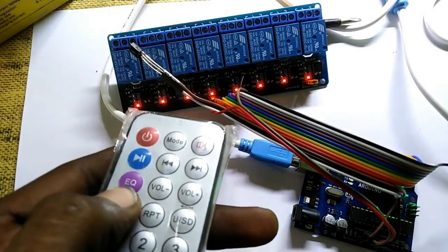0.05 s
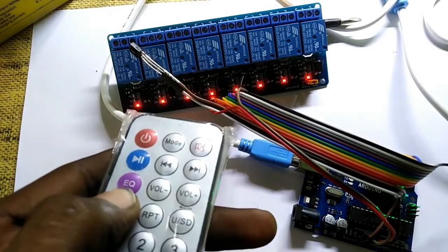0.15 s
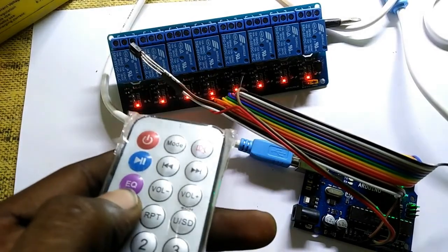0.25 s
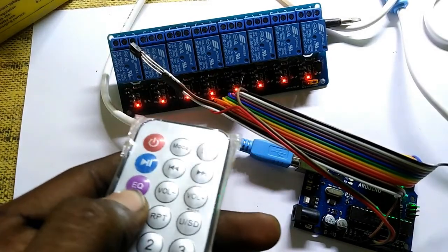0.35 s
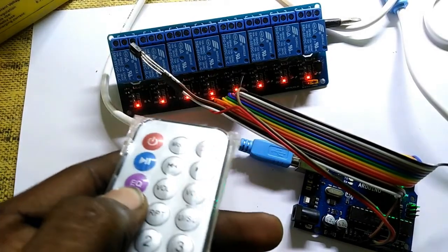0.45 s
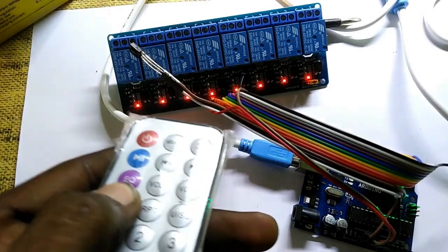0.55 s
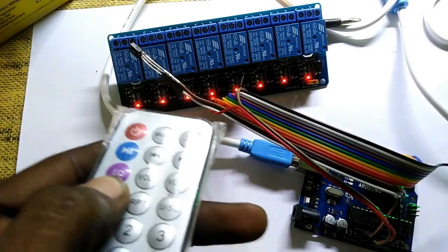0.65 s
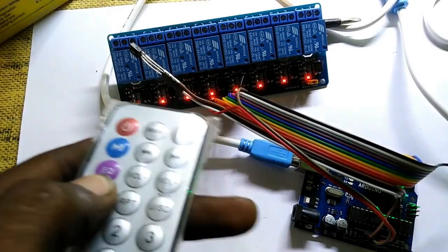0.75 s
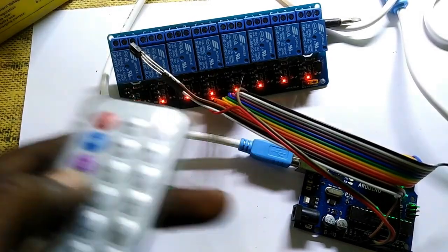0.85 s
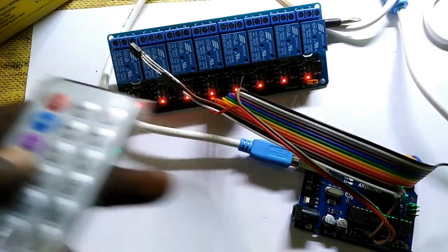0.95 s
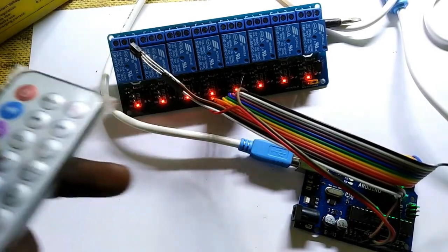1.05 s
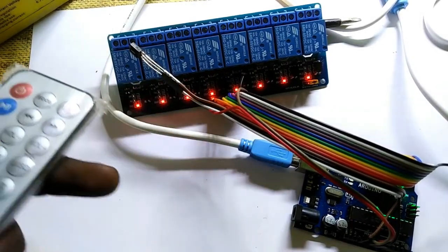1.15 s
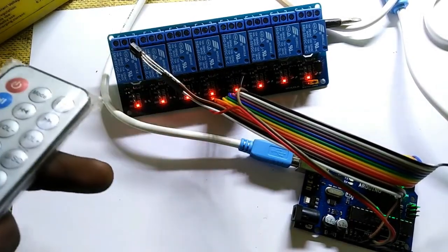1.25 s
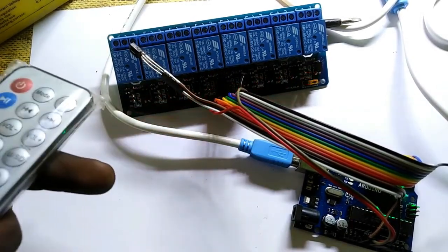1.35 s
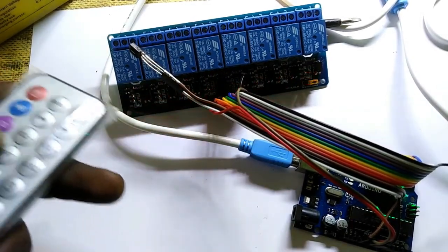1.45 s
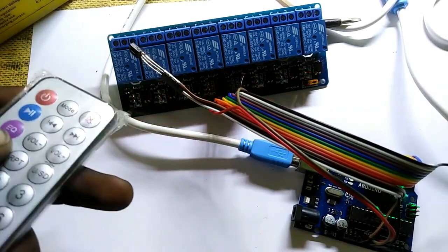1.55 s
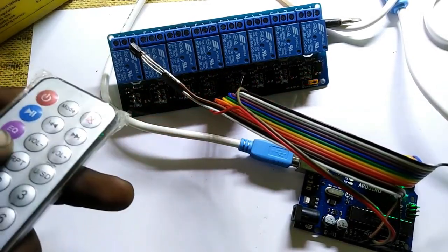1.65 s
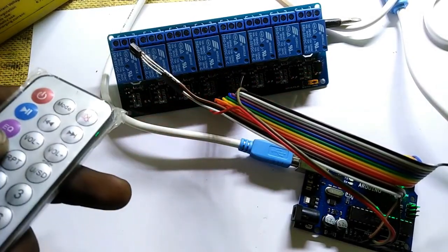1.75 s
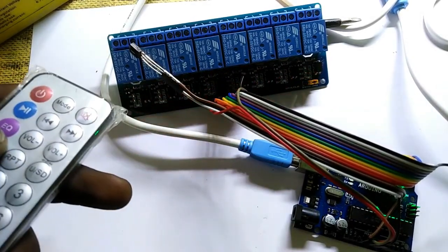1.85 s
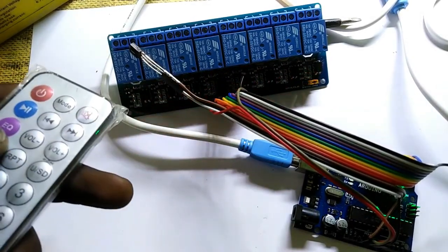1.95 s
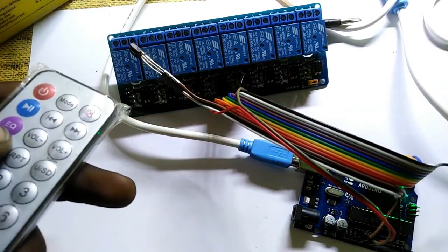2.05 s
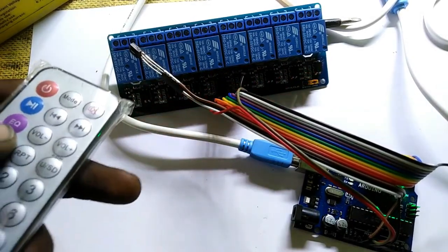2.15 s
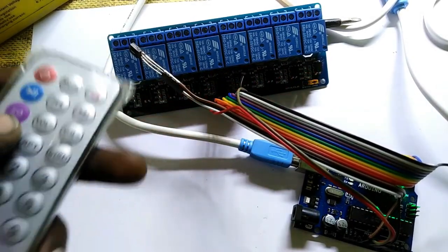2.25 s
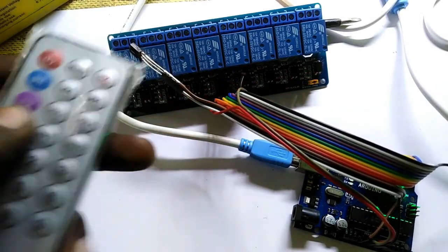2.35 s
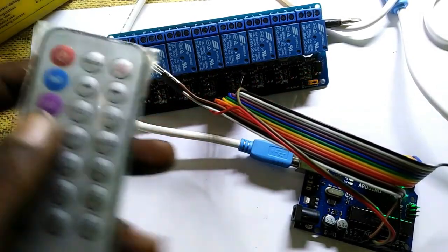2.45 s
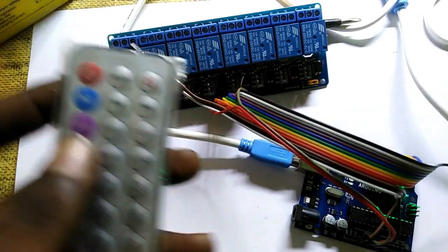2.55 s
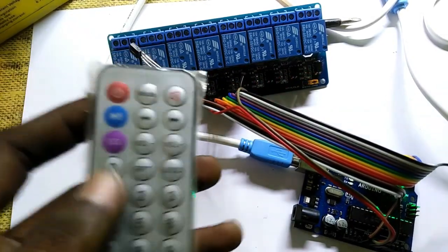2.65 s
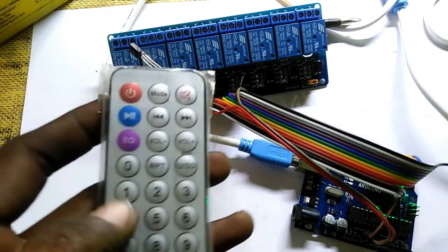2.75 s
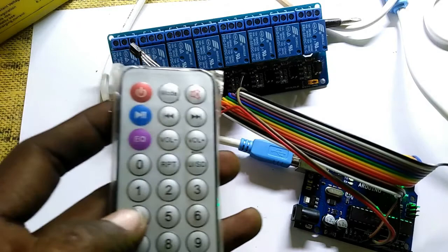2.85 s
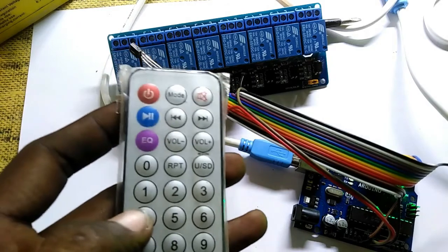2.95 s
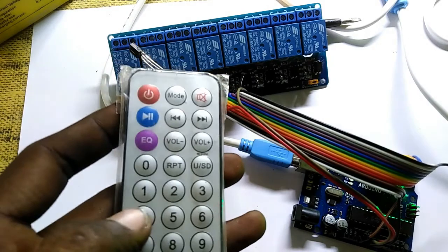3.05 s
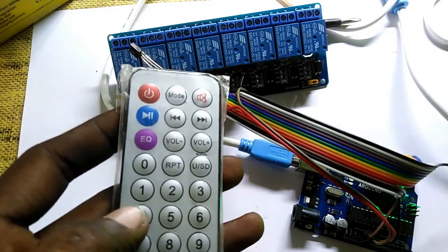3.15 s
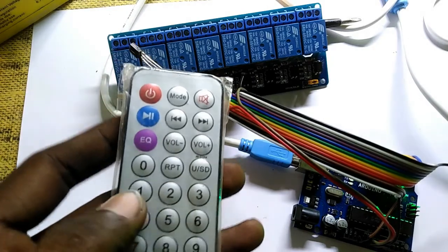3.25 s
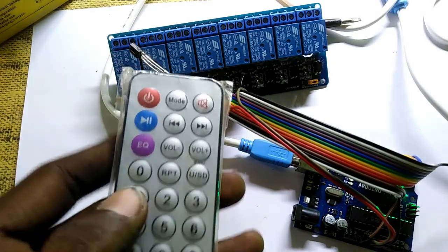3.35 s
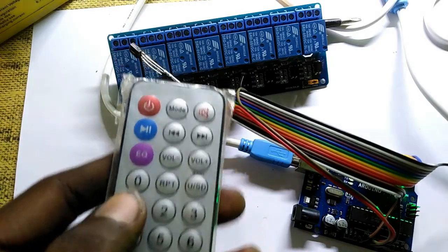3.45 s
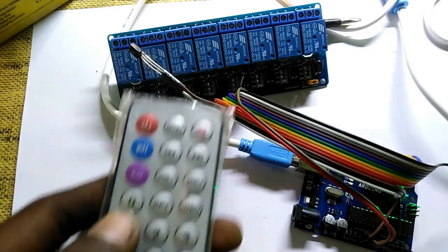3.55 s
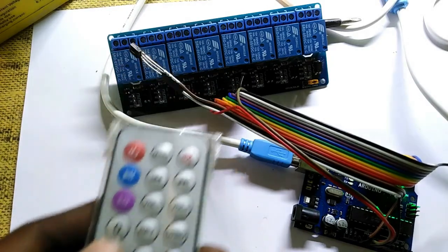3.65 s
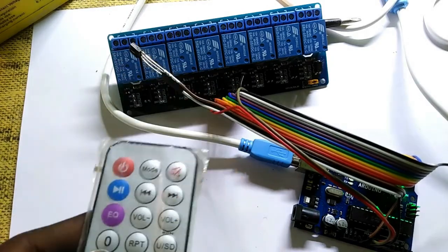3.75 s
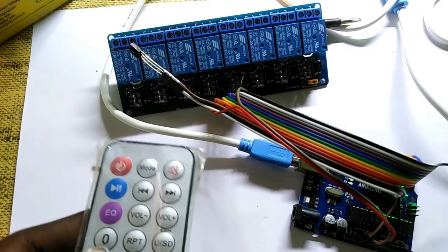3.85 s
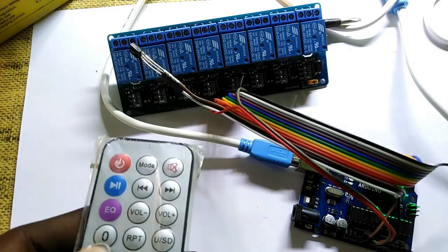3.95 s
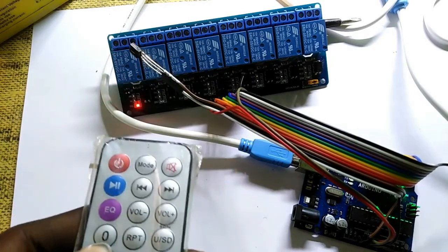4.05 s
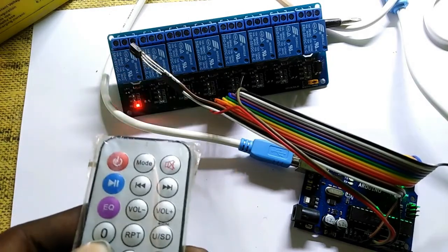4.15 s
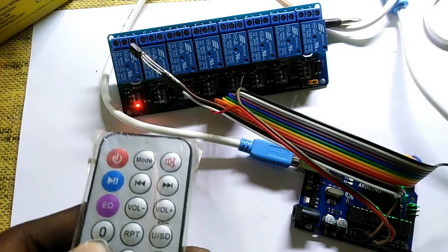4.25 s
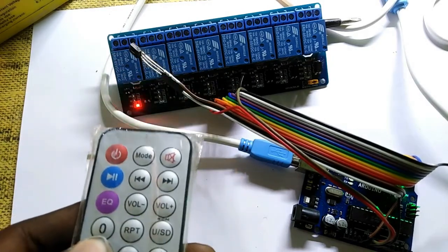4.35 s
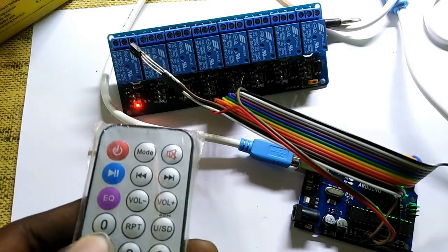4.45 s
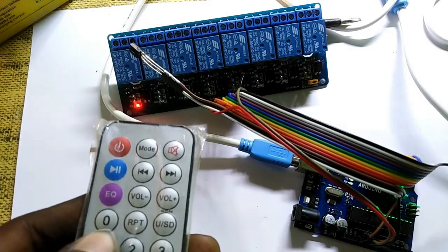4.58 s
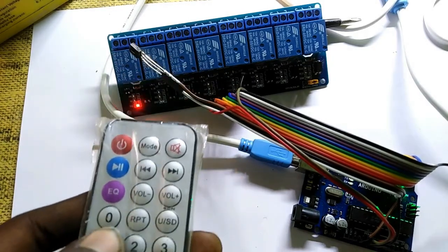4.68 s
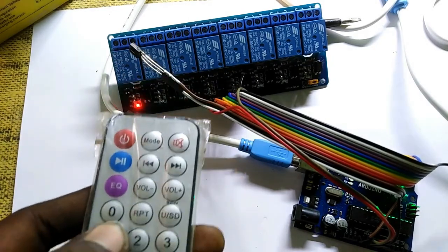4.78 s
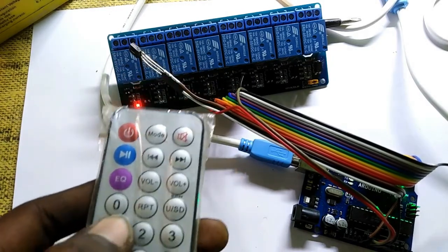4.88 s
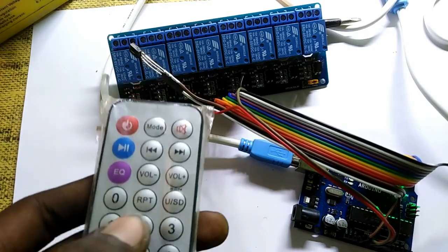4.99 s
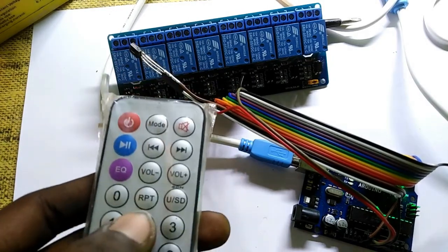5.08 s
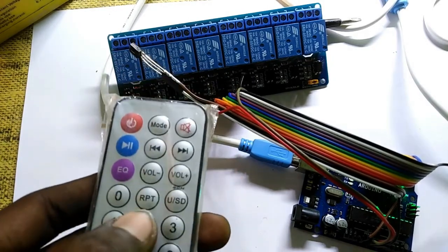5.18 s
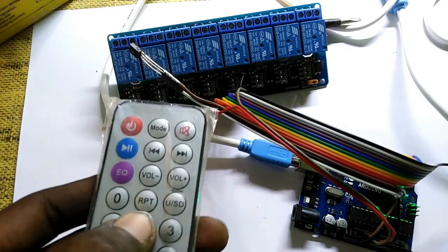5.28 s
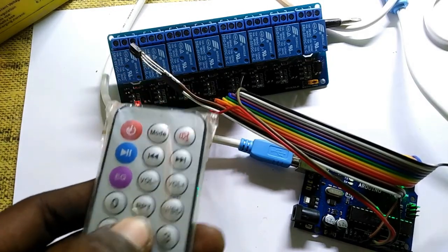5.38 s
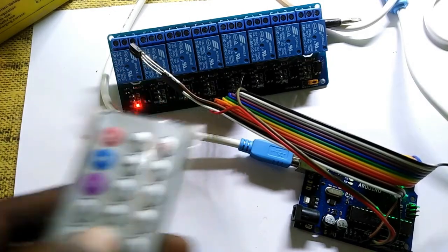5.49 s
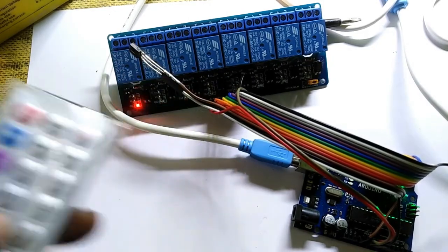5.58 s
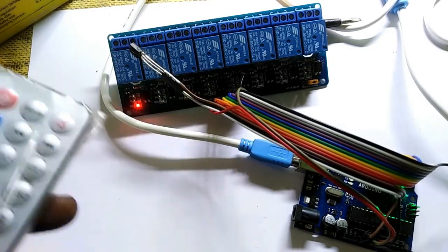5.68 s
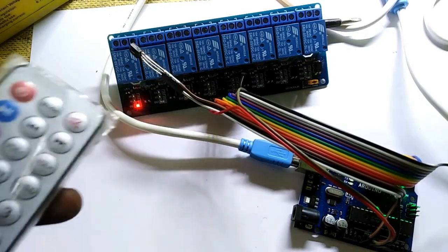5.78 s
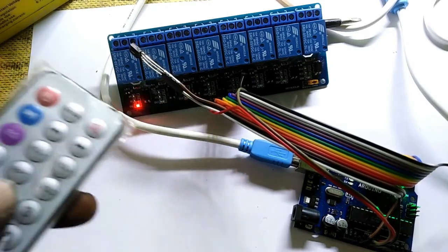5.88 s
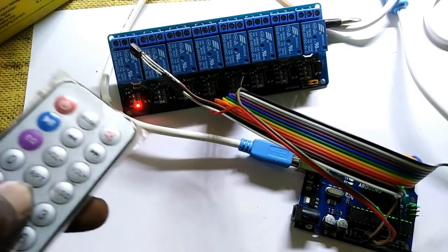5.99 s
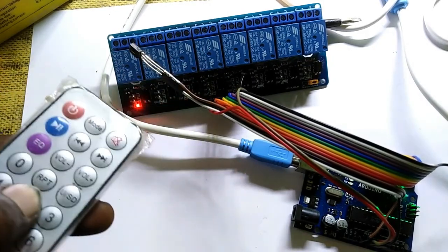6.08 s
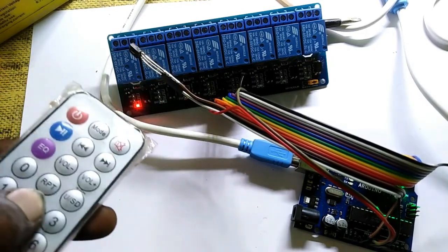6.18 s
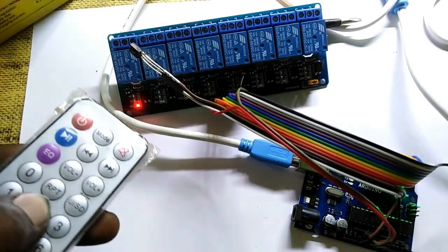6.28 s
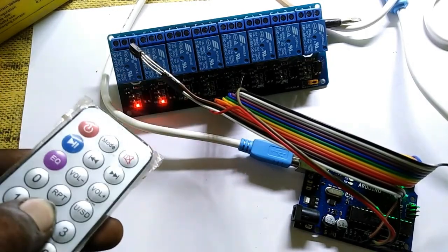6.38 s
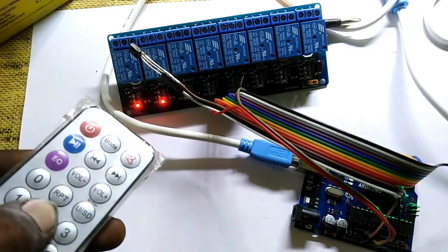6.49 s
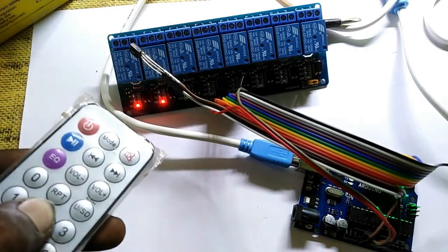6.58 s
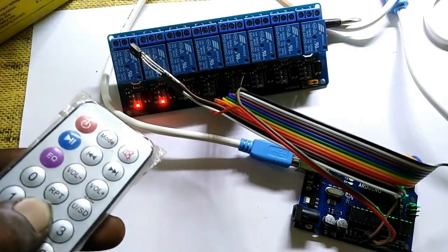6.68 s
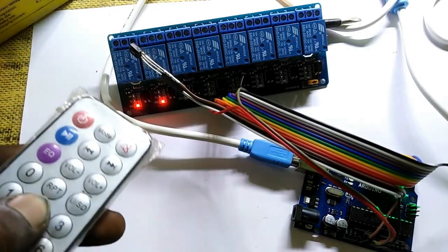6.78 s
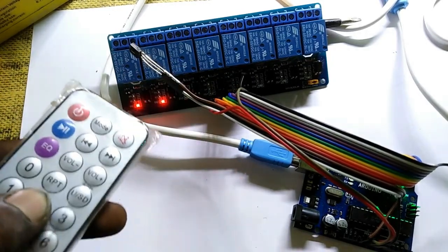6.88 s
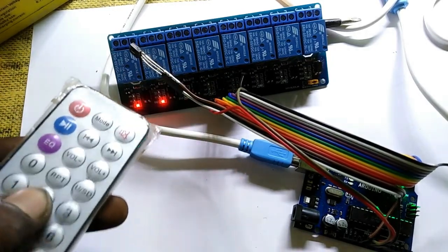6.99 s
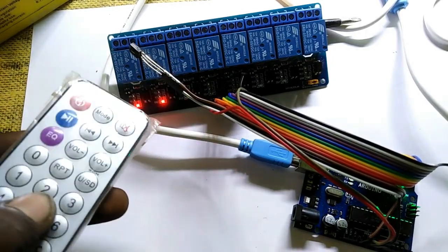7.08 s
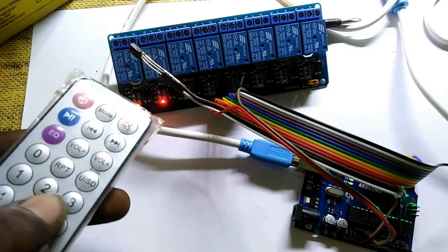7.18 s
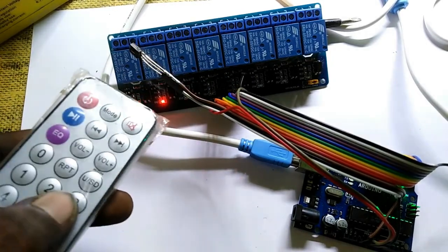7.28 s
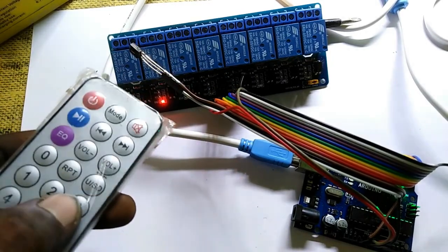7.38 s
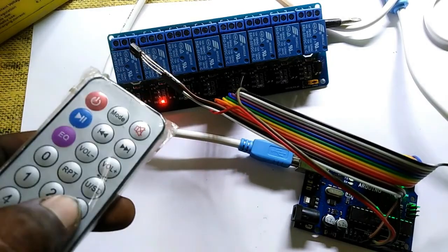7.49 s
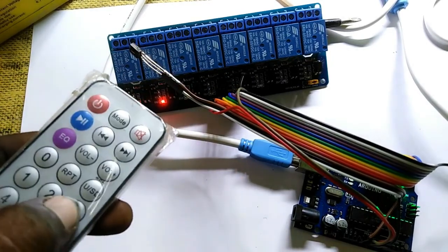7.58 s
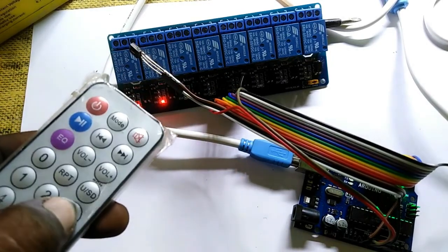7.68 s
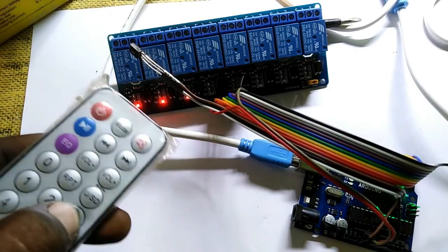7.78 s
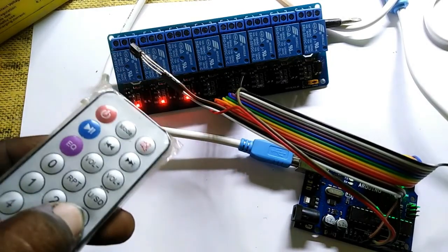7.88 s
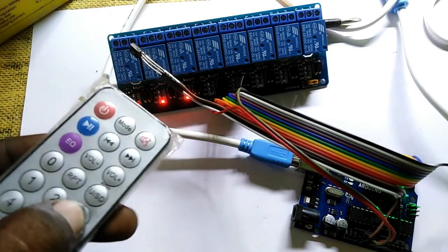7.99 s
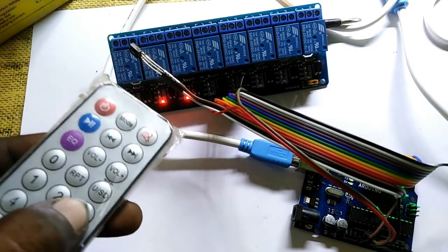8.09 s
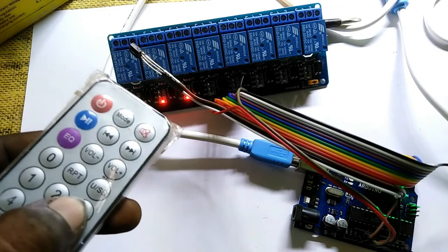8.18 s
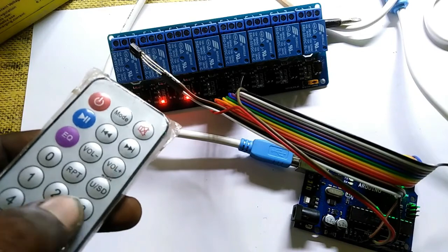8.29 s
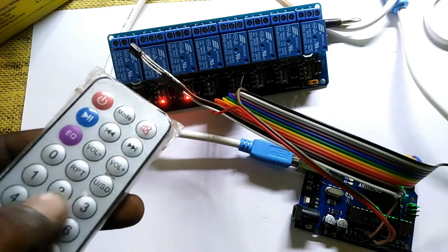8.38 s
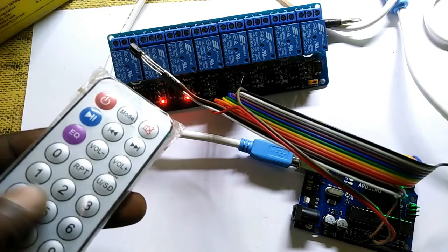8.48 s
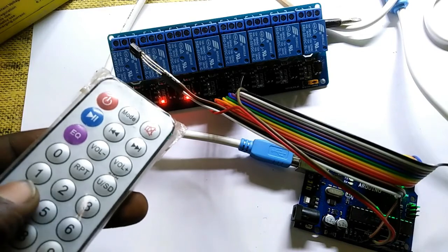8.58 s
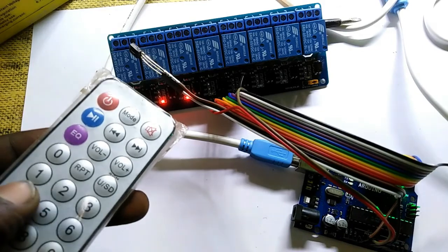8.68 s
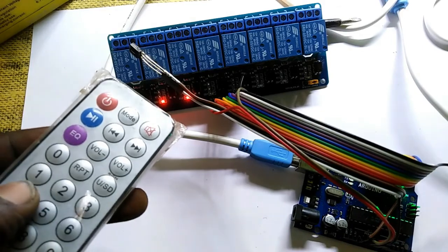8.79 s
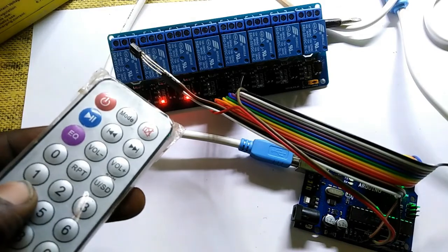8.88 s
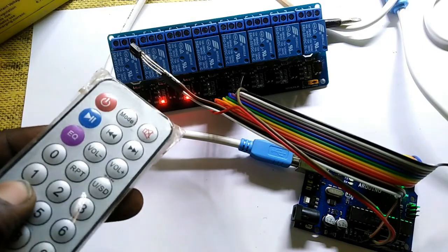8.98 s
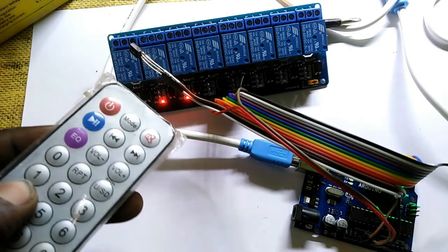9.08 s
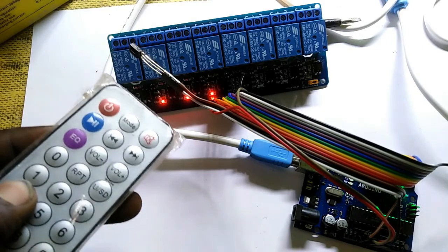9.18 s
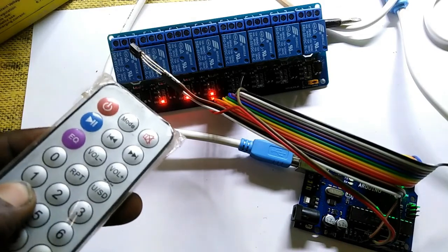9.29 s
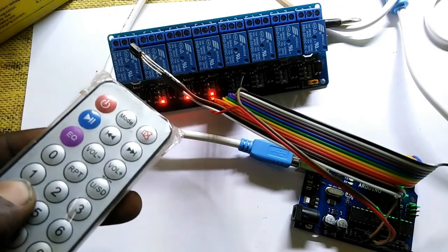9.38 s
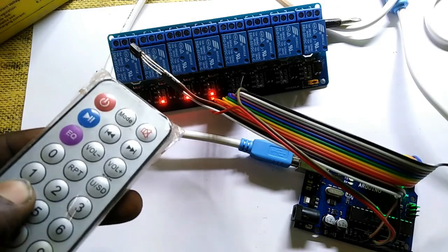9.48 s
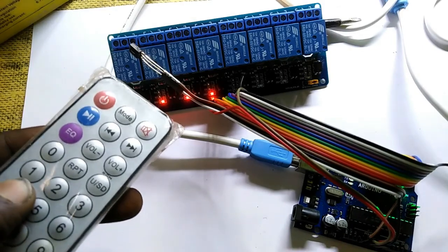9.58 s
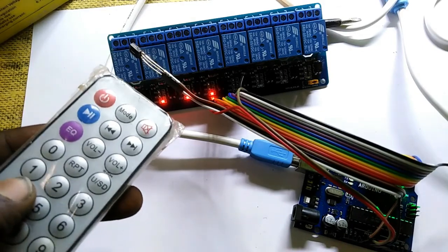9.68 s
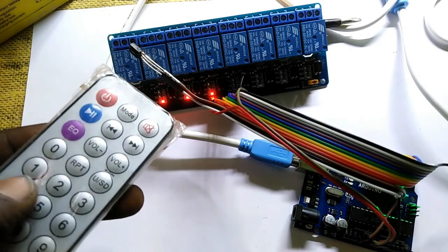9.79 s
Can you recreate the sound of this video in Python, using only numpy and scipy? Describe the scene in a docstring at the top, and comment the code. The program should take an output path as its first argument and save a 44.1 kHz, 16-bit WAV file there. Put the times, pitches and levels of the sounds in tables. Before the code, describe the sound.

Close-up loud relay snaps on a small circuit board, with a handheld remote's plastic sleeve ticking and rustling, and a bird chirping faintly outside.

```python
"""Relay board in a hard room

A relay board on a desk is switched with a small remote control, close to a two-port microphone.
All eight relays drop out almost at once and shake the board; later four pull in, one by one.
The remote's keys clack; its plastic sleeve rubs, snaps and crinkles. A bird calls outside, and there are
a few soft knocks, low handling bumps and brief hollow tones over room air and hiss.
Struck things are resonant or noisy clicks sent through a direct, a near and a room path."""
import sys
import numpy as np
from scipy import signal
from scipy.io import wavfile
from scipy.ndimage import uniform_filter1d

SR = 44100
rng = np.random.default_rng(int(sys.argv[2]) if len(sys.argv) > 2 else 0)


def master_out(mix):
    """Clip the mix to full scale and print it as 16-bit PCM to the path in sys.argv[1]."""
    frames = np.transpose(np.atleast_2d(mix))
    ceiling = np.clip(frames, -1, 1)
    pcm = np.round(ceiling * 32767).astype(np.int16)
    wavfile.write(sys.argv[1], SR, pcm)


N = 433944
TIME = np.arange(N) / SR
TAPS = 4096  # samples in one click
BINS = np.fft.rfftfreq(TAPS, 1 / SR)  # its frequencies, Hz

# relays pulling in: [t/s, level/dB, the armature's low, middle and top mode f/Hz,
# contact chatter level/dB, push on the board level/dB, lingering ring level/dB]
PULL_INS = [(3.907, 3.5, 7500, 9700, 13570, 0.5, -49.5, -16),
            (6.2228, 2.2, 6770, 9700, 12850, -2.5, -46.5, -18.5),
            (7.6506, 1.5, 7060, 8350, 11350, -0.5, -49.5, -20.5),
            (8.9656, 3, 6270, 9130, 12550, -3.5, -48, -29)]
# modes of a relay case: [f/Hz, width/Hz, level/dB]
CASE_MODES = [(2360, 120, -1), (2610, 210, -4.5), (3450, 270, -7), (4700, 340, -14), (6190, 232, -17),
              (7420, 1300, -0.5)]
# colour of a hard plastic snap: [f/Hz, level/dB]
PLASTIC_COLOUR = [(300, -19), (1600, -14.5), (2400, 2), (5500, 4), (7500, 7), (10000, 3.5), (13800, 10)]


def amp(db):
    """Decibels to gain."""
    return 10 ** (np.asarray(db) / 20)


def evened(x):
    """Scales to rms 1."""
    return x / np.sqrt(np.mean(x ** 2) + 1e-20)


def unit(x):
    """Scales each channel to energy 1."""
    return x / np.linalg.norm(x, axis=-1, keepdims=True)


def read(points, hz):
    """Reads a table on a log-frequency axis."""
    f, value = np.transpose(points)
    return np.interp(np.log(hz + 1), np.log(f + 1), value)


def add(mix, s, sound):
    """Adds a sound to the stereo mix at time s, cut where the mix ends."""
    part = mix[:, max(round(s * SR), 0):][:, :sound.shape[-1]]
    part += sound[..., :part.shape[1]]


def convolve(a, b):
    """Convolution along time, channel by channel."""
    return signal.fftconvolve(np.atleast_2d(a), np.atleast_2d(b), axes=1)


def impulse(db):
    """The minimum-phase click that has this spectrum, with dips limited to 100 dB below the peak."""
    log_gain = np.log(amp(np.maximum(db, db.max() - 100)))
    circle = np.r_[log_gain, log_gain[-2:0:-1]]
    return np.fft.ifft(np.exp(np.conj(signal.hilbert(circle)))).real


def resonances(modes):
    """Spectrum in dB of a body with these modes; it radiates little below them."""
    power = 0
    for hz, width, db in modes:
        detuning = (BINS ** 2 - hz ** 2) / (width * (BINS + 1))
        power = power + amp(db) ** 2 / (1 + detuning ** 2)
    return 10 * np.log10(power)


def top_treble(edge_hz=9500):
    """A soft step over frequency from 0 to 1 around the edge."""
    return 1 / (1 + (edge_hz / (BINS + 1)) ** 8)


def scatter(t60, size=2 * TAPS):
    """A dying cloud of reflections, different at each microphone port."""
    t = np.arange(size) / SR
    cloud = rng.standard_normal((2, size)) * amp(-60 * t / t60)
    return unit(cloud * (1 - np.exp(-t / .001)))


def room(delay=0.0043):
    """The late sound of the room: each band has its own strength and dies at its own speed."""
    # reverberation by band: [f/Hz, t60/s, level/dB]
    reverb = np.array([(306, 0.32, 5.5), (1170, 0.44, -1.5), (2350, 0.34, 4.5), (3140, 0.49, 4.5),
                       (4960, 0.59, 4.5), (13300, 0.47, -5)])
    hz, t = np.fft.rfftfreq(256, 1 / SR), np.arange(0, .8, 128 / SR)
    a, b = rng.standard_normal((2, 2, len(hz), len(t)))
    t60, db = (read(reverb[:, [0, k]], hz)[:, None] for k in (1, 2))
    tail = signal.istft((a + 1j * b) * amp(db - 60 * t / t60), SR, nperseg=256)[1]
    build_up = 1 - np.exp(-(np.arange(tail.shape[1]) / SR / delay) ** 2)
    return unit(tail * build_up)


def heard(sound, direct_db, near_db, near_t60, room_db):
    """A sound arrives directly (right port first), off the desk and hand, and from the room."""
    path = amp(room_db) * room()
    add(path, 0, amp(near_db) * scatter(near_t60))
    path[[0, 1], [8, 0]] += amp(direct_db)  # the left port is 8 samples later
    return convolve(sound, path)


def rubbing(uneven_db=2.0, rise_s=0.016, fade_s=0.2):
    """Loudness of the sleeve's rubbing: it builds unevenly while the grip shifts and fades as the hand settles."""
    # shifts of the grip: [start t/s, end t/s, rub level/dB]
    grips = [(0.889, 1.25, -62.5), (2.067, 2.559, -57), (2.94, 3.427, -63), (3.46, 3.795, -62.5),
             (4.62, 5.46, -61), (5.68, 6.15, -63.5), (6.687, 7.046, -61), (7.374, 7.574, -62.5),
             (8.075, 8.32, -60.5), (8.53, 8.608, -57), (9.134, 9.69, -61.5)]
    power = np.zeros(N)
    for start, end, db in grips:
        swell = 1 - np.exp(-np.maximum(TIME - start, 0) / rise_s)
        fade = np.exp(-np.maximum(TIME - end, 0) / fade_s)
        power += (amp(db) * swell * fade) ** 2
    uneven = evened(uniform_filter1d(rng.standard_normal(N), size=1500))
    return np.sqrt(power) * amp(uneven_db * uneven)


def background(air_db=-59, hiss_db=-59.5, patch_db=1.9, flicker_db=5.0, top_follow=0.52):
    """Patchy, flickering room air, and a steady hiss that grows louder and broader as the sleeve rubs."""
    # room air, relative spectrum: [f/Hz, level/dB per Hz]
    air_colour = [(28, -45), (45, -26), (90, 4), (150, -4), (250, -4), (420, -3.5), (700, -17.5),
                  (850, -11.5), (960, 3), (1100, -9), (1500, -17.5), (2500, -18.5), (4000, -20),
                  (9000, -27.5)]
    # hiss, relative spectrum: [f/Hz, level/dB per Hz]
    hiss_colour = [(1400, -7), (2200, -11), (3200, -27), (4300, -5.5), (5200, 7), (5700, -4.5), (6400, 5),
                   (9500, -4.5), (14500, -8)]
    # likeness of the two ports: [f/Hz, left-right correlation]
    likeness = [(50, 0.75), (300, 0.94), (1200, 0.12), (2500, 0.019)]
    hz, t = np.fft.rfftfreq(1024, 1 / SR), np.arange(N // 256 + 5) * 256 / SR
    a, b, c, d, patches, flicker = rng.standard_normal((6, len(hz), len(t)))
    # smoothed over frequency, then over time
    patches = evened(uniform_filter1d(uniform_filter1d(patches, size=3, axis=0), size=7, axis=1))
    flicker = evened(uniform_filter1d(uniform_filter1d(flicker, size=3, axis=0), size=5, axis=1))

    same = np.clip(read(likeness, hz), -1, 1)[:, None]
    left = a + 1j * b
    right = same * left + np.sqrt(1 - same ** 2) * (c + 1j * d)
    z = np.array([left, right])

    level_db = 20 * np.log10(np.hypot(amp(hiss_db), np.interp(t, TIME, rubbing())))
    off_centre = np.minimum(abs(np.log2((hz + 1) / 6000)), 1)  # octaves from 6 kHz, at most 1
    broaden_db = top_follow * np.outer(off_centre, level_db - level_db.mean())
    restless = np.clip(hz / 1000, 0, 1)[:, None]  # the bass is steadier than the middle
    air = z * amp(read(air_colour, hz)[:, None] + restless * (patch_db * patches + flicker_db * flicker))
    hiss = 1j * z * amp(read(hiss_colour, hz)[:, None] + patch_db * patches + broaden_db)
    air, hiss = (evened(signal.istft(v, nperseg=1024, noverlap=768)[1][:, :N]) for v in (air, hiss))
    return amp(air_db) * air + amp(np.interp(TIME, t, level_db)) * hiss


def bird(waver=0.0066, flutter=0.0075, second_db=-7, third_db=-6, echo_s=0.11, echo_db=-9):
    """Fluttering whistles climb, leap in pitch and fade; overtones join when loud, and a wall echoes them."""
    # calls: [t/s, length/s, starting f/Hz, leap in pitch/Hz (negative is down), time until the leap/s, level/dB]
    chirps = [(0.0, 0.14, 3700, -10, 0.11, -66.5), (4.903, 0.22, 3746, 246, 0.061, -62),
              (5.309, 0.17, 4045, 220, 0.115, -50), (5.829, 0.25, 4172, 209.5, 0.12, -53)]
    climb_hz_per_s, leap_s = 553, 0.0095
    rise_s, fade_db_per_s = 0.055, 58
    mix = np.zeros((2, N))
    for s, length, hz, leap_hz, leap_at, db in chirps:
        t = np.arange(0, length, 1 / SR)
        fast, slow = (evened(uniform_filter1d(rng.standard_normal(SR), size=size))[:len(t)]
                      for size in (90, 600))
        leap = .5 + .5 * np.tanh((t - leap_at) / leap_s)
        pitch = (hz + climb_hz_per_s * t + leap_hz * leap) * (1 + waver * fast + flutter * slow)
        phase = 2 * np.pi * np.cumsum(pitch) / SR
        swell = np.minimum(t / rise_s, 1) * amp(-fade_db_per_s * np.maximum(t - rise_s, 0))
        tone = sum(amp(level) * swell ** k * np.sin(k * phase)
                   for k, level in enumerate([0, second_db, third_db], 1))
        for delay, path_db in ((0, 0), (echo_s, echo_db)):
            call = amp(db + path_db) * tone * signal.windows.tukey(len(t), .1)
            add(mix, s + delay, heard(call, direct_db=10, near_db=6.5, near_t60=0.06, room_db=6.5))
    return mix


def hollows(width_hz=130, seconds=0.12):
    """Brief hollow tones: narrow bands of noise swell and fade."""
    # tones: [t/s, f/Hz, level/dB]
    hollow_tones = [(0.0, 1917, -50), (1.904, 973, -56), (5.97, 1250, -53), (6.26, 775, -54),
                    (6.669, 937, -55), (8.661, 970, -54.5), (8.743, 1106, -55), (8.775, 1610, -65)]
    mix, swell = np.zeros((2, N)), signal.windows.hann(round(seconds * SR))
    for s, hz, db in hollow_tones:
        narrow = impulse(2 * resonances([(hz, width_hz, 0)]))  # the mode's curve squared
        band = convolve(rng.standard_normal((2, SR)), narrow)
        add(mix, s, amp(db) * swell * evened(band[:, TAPS:TAPS + len(swell)]))
    return mix


def bumps(rise=0.003):
    """The hand bumps the camera, and its body carries a low rumble to the microphone, stronger at right."""
    # bumps: [t/s, level/dB, t60/s], each cut off after 1 s
    hand_bumps = [(0.221, -58.5, 1.3), (0.921, -52.5, 1.1), (2.3, -59, 2.6), (3.699, -56.5, 1.5),
                  (6.129, -55, 0.56), (4.439, -59.5, 0.78), (7.352, -52, 0.81), (8.361, -38.5, 0.42),
                  (8.448, -53.5, 2.7)]
    # colour of the rumble: [f/Hz, level/dB]
    rumble_colour = [(35, -61), (55, -2.5), (90, 9.5), (160, -5), (330, -39.5)]
    mix, t = np.zeros((2, N)), TIME[:SR]
    for s, db, t60 in hand_bumps:
        noise = convolve(rng.standard_normal(SR), impulse(read(rumble_colour, BINS)))[0]
        rumble = evened(noise[TAPS // 2:][:SR])
        envelope = amp(db - 60 * t / t60) * (1 - np.exp(-t / rise))
        add(mix, s, envelope * rumble * amp([[-6], [4]]))
    return mix


def knocks():
    """Something hard is set down: a short ring with its treble dulled above 4.3 kHz, heard mostly directly,
    with reflections."""
    # knocks: [t/s, level/dB]
    soft_knocks = [(0.564, -36), (1.328, -30.5), (9.633, -36.5)]
    # modes of the knocked thing: [f/Hz, width/Hz, level/dB]
    knock_modes = [(1850, 93, 7.5), (2150, 100, 1.5), (2710, 330, -3), (3500, 220, -12)]
    ring = unit(impulse(resonances(knock_modes) - 25 * top_treble(edge_hz=4300)))
    mix = np.zeros((2, N))
    for s, db in soft_knocks:
        add(mix, s, amp(db) * heard(ring, direct_db=15, near_db=8, near_t60=0.14, room_db=6))
    return mix


def facet(width_hz=350):
    """A small panel of the sleeve pops over and rings briefly at a pitch of its own."""
    return unit(impulse(resonances([(rng.uniform(5000, 11000), width_hz, 0)])))


def plastic(full_db, top_db=-5):
    """One snap of the remote's plastic; a thin one keeps only its treble."""
    body_db = full_db * (1 - top_treble(edge_hz=5050))
    return unit(impulse(read(PLASTIC_COLOUR, BINS) + top_db * top_treble() + body_db))


def sleeve(per_s=60, spread_db=5, over_rub_db=16, count=12):
    """Faint random crinkles of the sleeve, whose strength follows the rubbing of the same grips."""
    chosen = rng.random(N) < per_s / SR
    strength_db = over_rub_db + spread_db * np.minimum(rng.exponential(1, N), 2)
    snaps = rubbing() * chosen * amp(strength_db)
    facets = [unit(facet() + plastic(full_db=-7.5)) for _ in range(count)]
    crackle = np.zeros((2, N))
    for at in np.flatnonzero(snaps):
        add(crackle, at / SR, snaps[at] * facets[at % count])
    placed = heard(crackle, direct_db=2, near_db=-8, near_t60=0.036, room_db=-14)[:, :N]
    return placed * amp([[-2], [2]])  # stronger at the right port


def in_hand(sound):
    """The remote is held close, nearer to the right port."""
    return heard(sound, direct_db=9.5, near_db=-1, near_t60=.03, room_db=-1) * amp([[-2.5], [2.5]])


def keys(full_db=-4, give_t60=0.0066):
    """A key clacks over, and the hollow shell of the remote rings briefly."""
    # presses: [t/s, clack level/dB, top treble level/dB, shell ring level/dB, factor on the shell modes' f]
    presses = [(0.9679, -18, -5.5, -31, 1.6), (4.413, -28.5, -18, -30, 1.13),
               (6.1038, -25, -13, -22.5, 1.02), (7.3632, -20.5, 7, -39, 0.97), (7.479, -22.5, 7, -34, 0.79),
               (9.4621, -23.5, 1, -30.5, 0.9)]
    # modes of the shell: [f/Hz before that factor, width/Hz, level/dB]
    shell_modes = [(2580, 53, 1.5), (3600, 260, -10.5)]
    mix = np.zeros((2, N))
    for s, db, top_db, ring_db, tune in presses:
        ring = unit(impulse(resonances([(hz * tune, width, level) for hz, width, level in shell_modes])))
        clack = unit(scatter(give_t60, size=TAPS) + signal.unit_impulse(TAPS))
        add(mix, s, amp(db) * in_hand(convolve(clack, plastic(full_db, top_db))))
        add(mix, s, amp(ring_db) * heard(ring, direct_db=7, near_db=1, near_t60=.06, room_db=-3))
    return mix


def relay_blow(armature_hz, treble_db=0, crack_db=-10):
    """The armature hits its stop: a bare crack, the ring of the case, and the armature's own three modes."""
    # low, middle and top armature mode: [width/Hz, level/dB]
    armature = [(650, 7.5), (850, 7.5), (850, 11)]
    modes = CASE_MODES + [(hz, width, db) for hz, (width, db) in zip(armature_hz, armature)]
    ring = impulse(resonances(modes) + treble_db * top_treble())
    crack = impulse(read(PLASTIC_COLOUR, BINS) + treble_db * top_treble())
    return unit(unit(ring) + amp(crack_db) * unit(crack))


def board_thud(edge_hz=1350):
    """The board flexes on the desk; only its low modes move."""
    # modes of the circuit board: [f/Hz, width/Hz, level/dB]
    board_modes = [(314, 15, 3.5), (388, 33, 4), (480, 120, -0.5), (630, 48, -4), (970, 52, 2.5),
                   (1128, 53, -1.5)]
    return unit(impulse(resonances(board_modes) - 10 * np.log10(1 + (BINS / edge_hz) ** 16)))


def drop_out(start_s=1.1492, spread=.0034, count=8):
    """Eight springs throw their armatures back almost together; the board thuds."""
    # all relays together: [level/dB, top treble level/dB, push on the board level/dB]
    db, treble_db, push_db = (-0.74, -3.5, -12.5)
    mix = np.zeros((2, N))
    for k in range(count):
        armature_hz = np.array(PULL_INS[k % len(PULL_INS)][2:5]) * rng.uniform(.88, 1.05)
        click = relay_blow(armature_hz, treble_db)
        at = start_s + spread * (k + rng.random()) / count
        add(mix, at, amp(db) * heard(click, direct_db=-1.5, near_db=-3.5, near_t60=0.09, room_db=-16.5))
    thud = heard(board_thud(), direct_db=9.5, near_db=7.0, near_t60=0.21, room_db=8)
    add(mix, start_s, amp(push_db) * thud)
    return mix


def ticks(rattle_db=-4, facet_db=-9):
    """The sleeve buckles: a sharp snap with a brief rattle that colours each one differently."""
    # loudest snaps: [t/s, level/dB, fullness/dB: near 0 a broad clack, far below it a thin tick]
    loud_snaps = [(2.0555, -29, -33), (2.0735, -32.5, -1), (2.101, -27, -5), (2.151, -30, -6),
                  (2.23, -29.5, -9), (2.3522, -33, -3), (2.4302, -26, -27), (2.4698, -33, -17),
                  (3.0157, -27, -7), (3.0945, -21.5, -8.5), (3.492, -23, -24.5), (3.6756, -23.5, -29),
                  (4.3545, -35, -15), (4.4518, -19, -9), (4.4722, -23.5, -8), (4.627, -32, -24),
                  (4.6973, -28.5, -20), (4.779, -21.5, -5), (4.7909, -12.5, -21), (5.2976, -29, -11),
                  (6.6738, -26.5, -38), (7.0162, -30.5, -25), (7.451, -29, -26), (7.925, -20, -18),
                  (8.0843, -27.5, -31), (8.1151, -22, -19), (8.1487, -27, -27), (8.158, -27, -24),
                  (8.216, -28, -27), (8.617, -29.5, -5), (9.3872, -29, -31)]
    mix = np.zeros((2, N))
    for s, db, full_db in loud_snaps:
        snap = amp(rattle_db) * scatter(0.006, size=TAPS) + signal.unit_impulse(TAPS)
        colour = unit(plastic(full_db) + amp(facet_db) * facet())
        add(mix, s, amp(db) * in_hand(convolve(snap, colour)))
    return mix


def scrapes(slips_per_s=1500, full_db=-1, top_db=-8):
    """A finger slips on the sleeve: a short, dense run of tiny catches."""
    # slips of the finger: [t/s, length/s, level/dB]
    finger_slips = [(2.117, 0.035, -26), (2.423, 0.015, -32.5), (4.827, 0.028, -28), (8.093, 0.011, -42),
                    (9.443, 0.0086, -28.5)]
    mix = np.zeros((2, N))
    for s, length, db in finger_slips:
        chance, force = rng.random(TAPS), rng.standard_normal(TAPS)
        swell = np.sin(np.pi * np.minimum(TIME[:TAPS] / length, 1))
        catches = unit(force * (chance < slips_per_s / SR) * swell)
        add(mix, s, amp(db) * in_hand(convolve(catches, plastic(full_db, top_db))))
    return mix


def pull_ins(chatter_t60=0.0052, push_hz=900, ring_t60=0.38, rebound_db=-22, rebound_s=0.0039, count=3):
    """A hard blow, contact chatter and uneven rebounds; two case modes ring on, and the board is pushed."""
    mix = np.zeros((2, N))
    push = unit(impulse(resonances([(push_hz, push_hz, 0)])))
    ring = unit(impulse(2 * resonances(CASE_MODES[:2])))  # the two lowest modes
    for s, db, *armature_hz, chatter_db, push_db, ring_db in PULL_INS:
        blows = amp(chatter_db) * scatter(chatter_t60)
        blows[:, 0] += 1
        click = convolve(blows, relay_blow(armature_hz))
        rebound_times = np.cumsum(rebound_s * (.5 + rng.random(count)))
        for k, at in enumerate(rebound_times, 1):
            rebound = relay_blow(np.array(armature_hz) * rng.uniform(.9, 1.1))
            add(click, at, amp(rebound_db) / np.sqrt(k) * rebound)
        add(mix, s, amp(db) * heard(click, direct_db=-1.5, near_db=-3.5, near_t60=0.071, room_db=-13.5))
        add(mix, s, amp(ring_db) * convolve(ring, scatter(ring_t60)))
        add(mix, s, amp(push_db) * heard(push, direct_db=-1, near_db=26.5, near_t60=0.018, room_db=8.0))
    return mix


def scene():
    """All sources on one stereo track."""
    outside_and_air = background() + bird() + hollows()
    handling = bumps() + knocks()
    remote = sleeve() + keys() + ticks() + scrapes()
    relays = drop_out() + pull_ins()
    return outside_and_air + handling + remote + relays


def suppress(x, depth_db=6.5, knee_db=2.5):
    """Noise suppressor: bins near their usual quiet level are turned down, which mottles the hiss."""
    hz, _, z = signal.stft(x, SR, nperseg=1024, noverlap=768)
    power = (abs(z) ** 2).mean(0)
    power = uniform_filter1d(uniform_filter1d(power, size=11, axis=1), size=3, axis=0)
    level_db = 10 * np.log10(abs(power) + 1e-20)
    over_db = level_db - np.percentile(level_db, 20, axis=1, keepdims=True)
    shut = .5 - .5 * np.tanh(over_db - knee_db)
    cut_db = depth_db * shut * np.clip(hz / 2000, 0, 1)[:, None]  # the bass is cut less
    return signal.istft(z * amp(-cut_db), nperseg=1024, noverlap=768)[1][:, :N]


def record(dry, edge_hz=14400):
    """Each microphone port has its own colour; then the noise suppressor, full scale and the band limit."""
    # colour of the left port: [f/Hz, level/dB]
    left_port = [(100, -5), (2400, 1), (6200, 10), (8200, 2), (10500, -3), (13000, -8.5), (14500, -9.5)]
    # colour of the right port: [f/Hz, level/dB]
    right_port = [(100, -6), (6200, 5.5), (8200, 6.5), (11200, 0), (13200, 6), (14500, 4)]
    ports = np.array([impulse(read(port, BINS)) for port in (left_port, right_port)])
    coloured = convolve(dry, ports)[:, :N]
    clipped = np.clip(suppress(coloured), -1, 1)
    low_pass = signal.firwin(321, edge_hz, window=("kaiser", 8), fs=SR)
    return signal.oaconvolve(clipped, low_pass[None], "same")


dry = scene()
out = record(dry)
master_out(out)
```